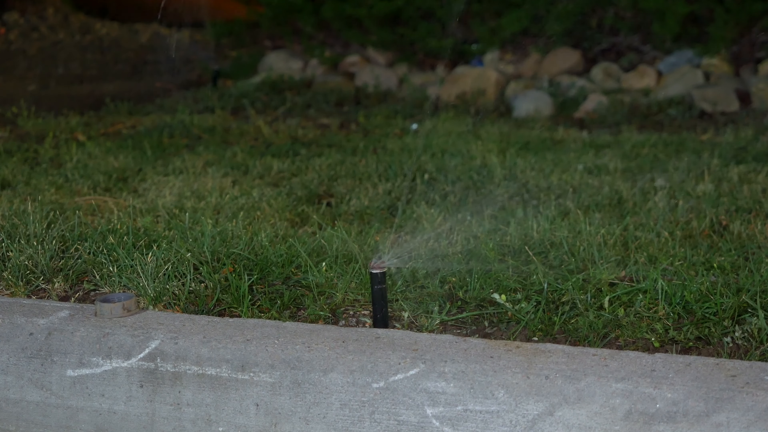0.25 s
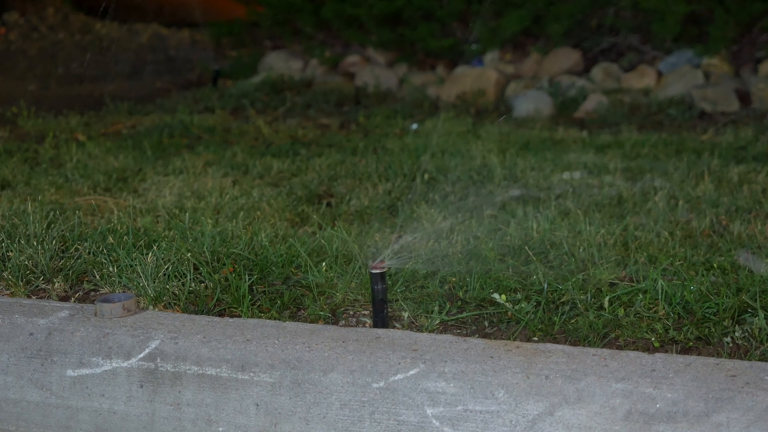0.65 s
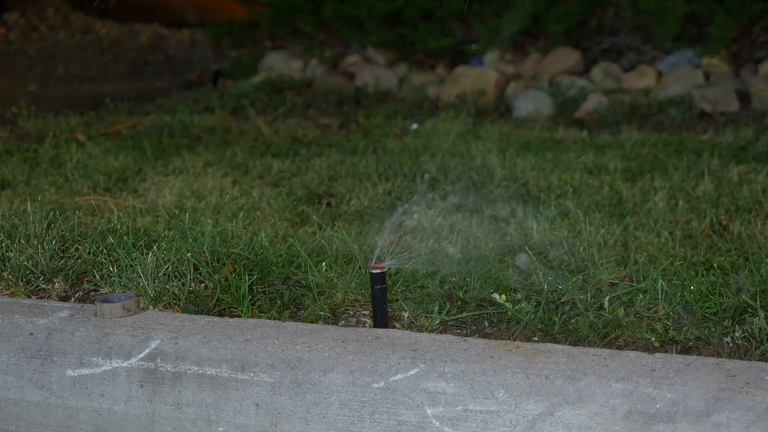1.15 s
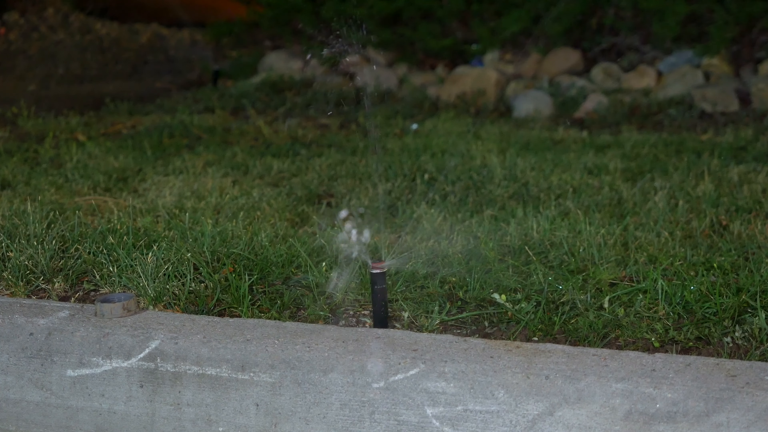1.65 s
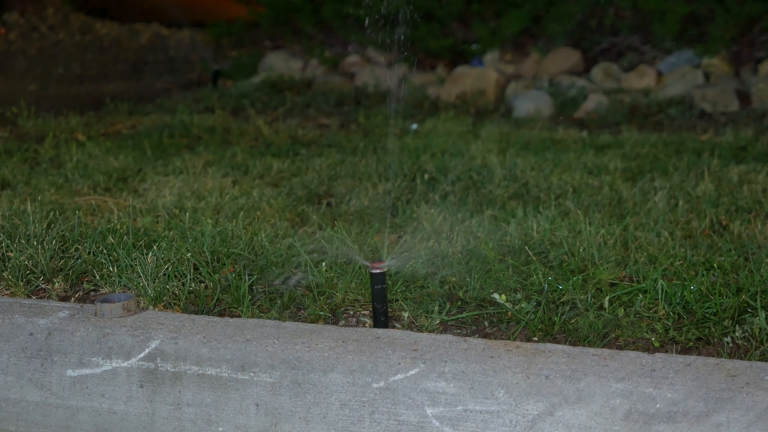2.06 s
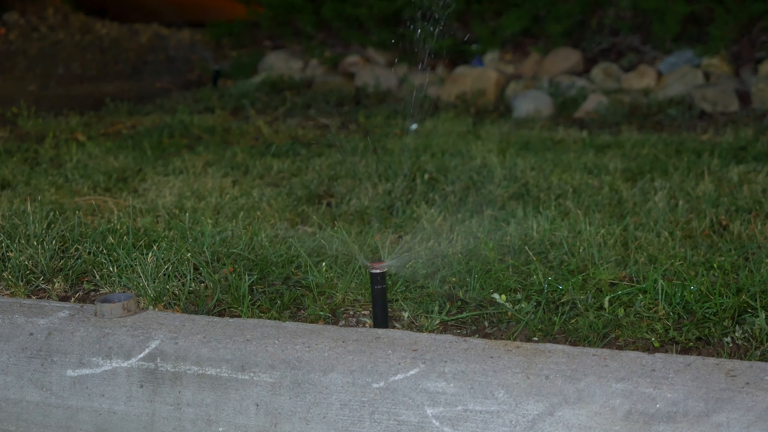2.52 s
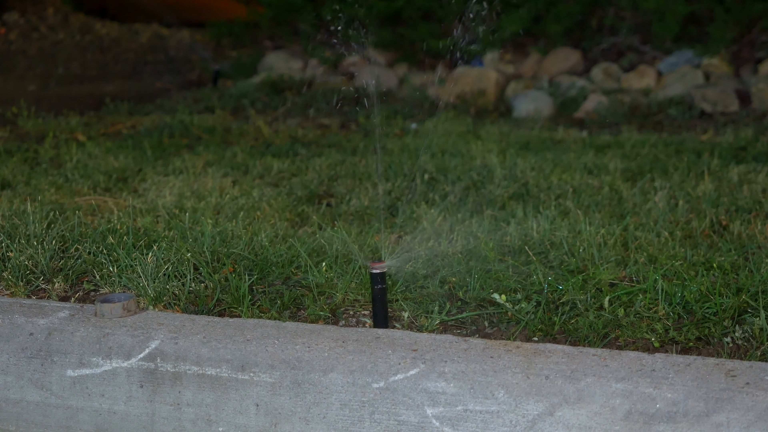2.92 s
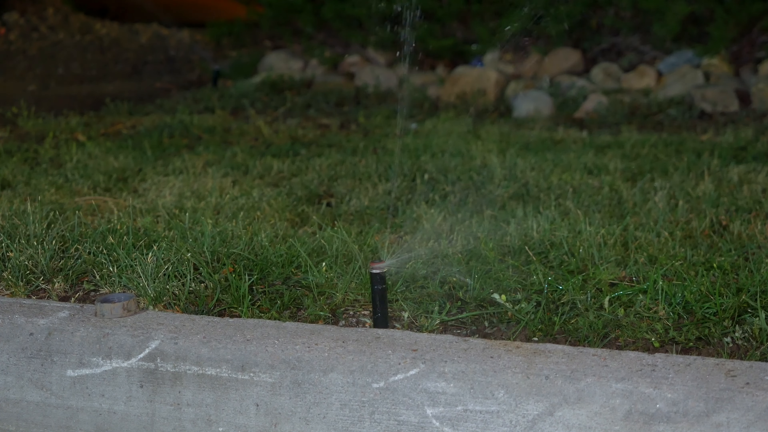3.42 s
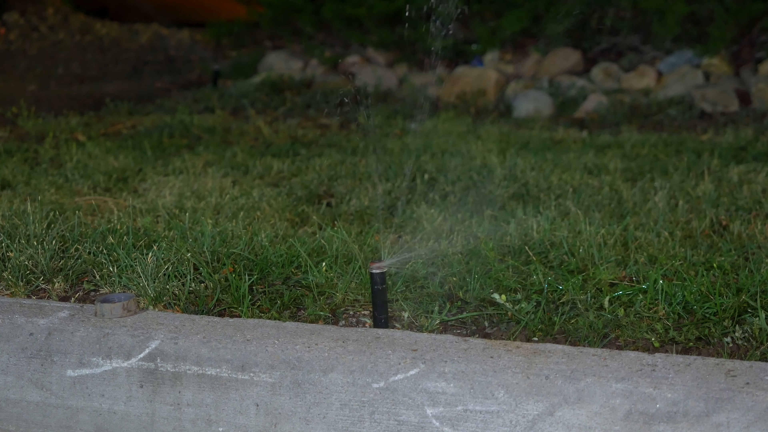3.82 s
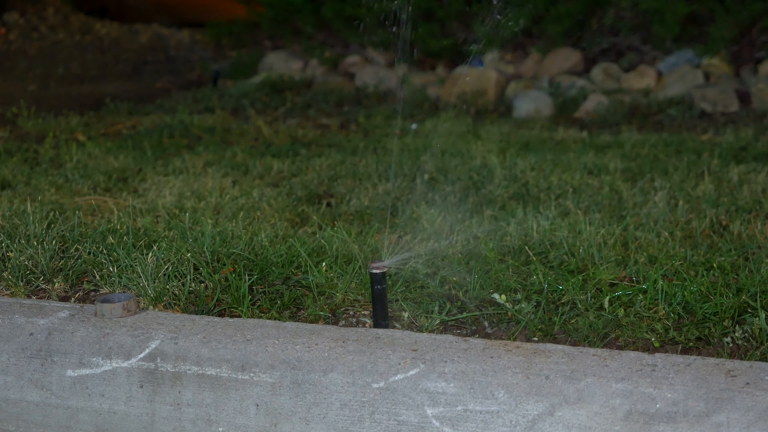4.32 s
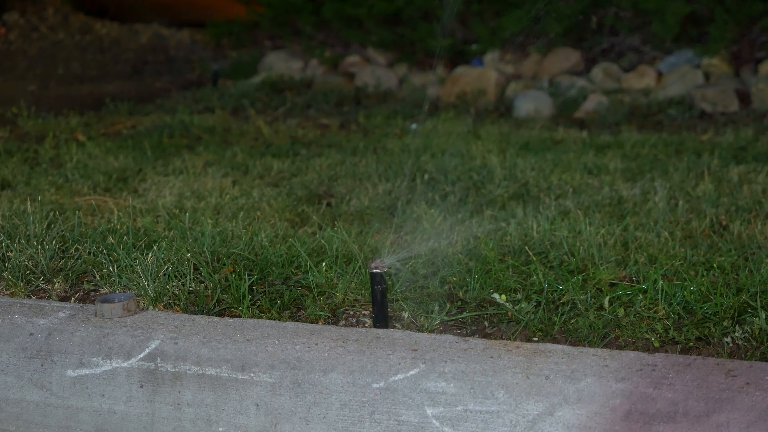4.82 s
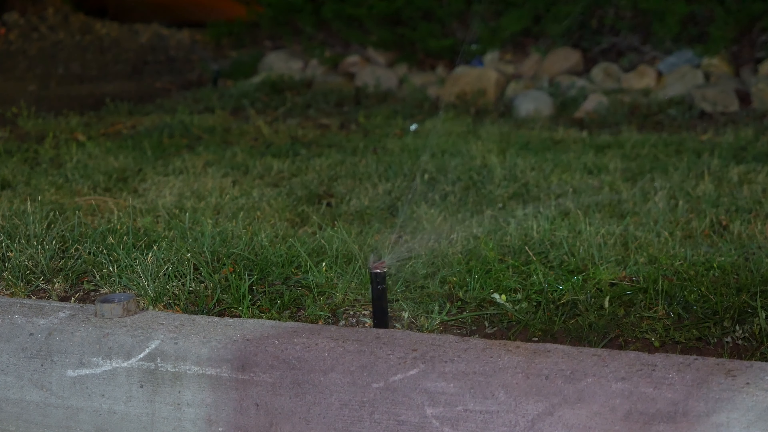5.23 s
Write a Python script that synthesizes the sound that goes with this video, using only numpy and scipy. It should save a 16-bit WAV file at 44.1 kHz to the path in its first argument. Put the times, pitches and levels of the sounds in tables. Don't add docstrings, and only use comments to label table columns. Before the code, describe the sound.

Close outdoor sound of a sprinkler nozzle spitting air and water. Bright turbulent hiss dominates, with uneven dips, a brief cutoff near one and a quarter seconds and a sharper one at two and a half. Lumpy water gurgles bubble below. After a longer stall near four and a half seconds the air blast collapses, leaving fine crisp mist, soft gurgling, a quiet fan hum and rumble.

```python
import sys
import numpy as np
from scipy import signal
from scipy.fft import rfft, irfft, next_fast_len
from scipy.io import wavfile
from scipy.ndimage import uniform_filter1d

SR = 44100
rng = np.random.default_rng(int(sys.argv[2]) if len(sys.argv) > 2 else 0)


def elevation(decibels):
    levels = np.asarray(decibels, float)
    return 10 ** (levels / 20)


def file_out(sig):
    cols = np.atleast_2d(sig).T
    lim = np.clip(cols, -1, 1)
    pcm = np.round(lim * 32767).astype(np.int16)
    wavfile.write(sys.argv[1], SR, pcm)


N = 241359

# start_s, blast_db (air pressure), churn_db (riser)
PIPE_STATE = [(0, -29, -43.5), (.9, -29, -47.5), (1.3, -28.5, -44.5), (2.0, -29, -44), (2.6, -28.5, -45.5),
              (3.2, -29, -44), (4.0, -28, -47.5), (4.28, -31.5, -46.5), (4.58, -33, -44.5),
              (4.64, -35.5, -43.5), (4.88, -43, -47.5), (5.47, -44, -44)]
# closing_s, shut_within_s, clears_s
WATER_SLUGS = [
    (1.22, .075, 1.3),
    (2.49, .03, 2.586),
    (4.28, .145, 4.577),
    (4.85, .12, 6),
]


def evened(x):
    return x / np.sqrt(np.mean(x ** 2) + 1e-20)


def read(points, hz):
    f, value = np.transpose(points)
    return np.interp(np.log(hz + 1), np.log(f + 1), value)


def column(table, t, axis):
    rows = np.asarray(table)
    return np.interp(t, rows[:, 0], rows[:, axis])


def drift(t, lo_hz, hi_hz):
    rates = np.geomspace(lo_hz, hi_hz, 30)
    cycles = rates * t[:, None] + rng.random(len(rates))
    return evened(np.sum(np.sin(2 * np.pi * cycles) / np.sqrt(rates), 1))


def spatter(per_s, spread_db, share):
    size = elevation(spread_db * np.minimum(rng.exponential(1, N), 5))
    ticks = size * (rng.random(N) < per_s / SR) * rng.choice([-1., 1.], N)
    share = np.clip(share, 0, 1)
    return np.sqrt(1 - share) * rng.standard_normal(N) + np.sqrt(share) * evened(ticks)


def shape(x, spectrum, lo_hz, hi_hz, level_db, patchy_db, size=512):
    overlap = size - size // 4
    hz, t, z = signal.stft(x, SR, nperseg=size, noverlap=overlap)
    patches = uniform_filter1d(rng.standard_normal(z.shape), 8, 0)
    patches = evened(uniform_filter1d(patches, 20, 1))
    colour = elevation(read(spectrum, hz))
    in_band = (hz > lo_hz) & (hz < hi_hz)
    colour = colour / np.sqrt(np.sum(colour[in_band] ** 2) / len(hz))
    z = z * colour[:, None] * elevation(level_db(hz[:, None], t) + patchy_db * patches)
    return signal.istft(z, SR, nperseg=size, noverlap=overlap)[1][:N]


def burps(t):
    # middle_s, half_length_s, over_churn_db
    air_pockets = [(1.077, .06, 5), (1.34, 0.074, 5), (1.633, 0.085, 4), (1.875, 0.12, 3.5),
                   (2.025, 0.017, 3), (2.332, .04, 7), (2.633, 0.045, 8.5), (2.788, 0.042, 5),
                   (3.018, 0.033, 2.5), (3.98, 0.076, 9), (4.32, 0.022, 3.5), (4.63, 0.036, 1.5)]
    return sum(db * np.exp(-((t - s) / half) ** 2) for s, half, db in air_pockets)


def shut(t):
    clear_s = .005
    closed = 0
    for s, within, clears in WATER_SLUGS:
        closed = closed + np.clip((t - s) / within, 0, 1) * np.clip((clears - t) / clear_s, 0, 1)
    return closed


def blast(t):
    # middle_s, length_s, depth_db
    spits = [(.94, 0.074, 1.5), (1.086, 0.11, 3.5), (1.209, 0.068, 4), (1.487, 0.044, 2.5), (1.62, .11, 6),
             (1.734, 0.033, 3), (1.83, 0.092, 7), (1.96, .04, 0), (2.053, 0.027, 1.5), (2.154, 0.033, 0),
             (2.283, 0.052, 2.5), (2.418, 0.043, 2), (2.481, 0.049, 16.5), (2.741, 0.048, 5),
             (2.838, 0.028, 2), (2.976, 0.029, 3), (3.093, 0.047, 1.5), (3.32, 0.036, 0.5), (3.65, .04, 1),
             (3.87, 0.067, 3.5), (3.966, 0.062, 5.5), (4.05, 0.018, 1.5)]
    shut_db, regain_db, regain_s = -38, -12, 0.02
    surge, surge_s = 0.22, 0.073
    level_db = column(PIPE_STATE, t, axis=1) + shut_db * shut(t) ** 2
    for _, _, clears in WATER_SLUGS:
        level_db = level_db + (t > clears) * regain_db * np.exp(-abs(t - clears) / regain_s)
    for s, length, depth_db in spits:
        after = np.maximum(t - s - length / 2, 0) / surge_s
        dam = np.exp(-(2 * (t - s) / length) ** 4)
        level_db = level_db - depth_db * (dam - surge * np.e * after * np.exp(-after))
    return level_db


def yard():
    # start_s, hum_db, rumble_db
    yard_levels = [(0, -50, -48.5), (.27, -42, -47.5), (.6, -56, -49), (.73, -41, -49), (1.3, -45, -46.5),
                   (1.65, -41, -44.5), (2.1, -48, -50), (2.5, -43.5, -45.5), (2.95, -41.5, -46),
                   (3.27, -51, -47), (3.52, -44, -46.5), (4.12, -54, -47.5), (4.48, -38.5, -48),
                   (4.87, -47.5, -45.5), (4.99, -38, -46.5), (5.25, -47, -43), (5.38, -40, -45.5),
                   (5.47, -57, -47)]
    # frequency_hz, density_db
    rumble_spectrum = [(25, -47), (50, -43), (70, -25), (90, -6.5), (120, -4.5), (160, -5.5), (255, -5.5),
                       (290, -16), (400, -33.5)]
    hum_hz, hum_width_hz = 120.3, 7.0
    t = np.arange(N) / SR
    turn = np.exp(2j * np.pi * hum_hz * t)
    r = np.exp(-np.pi * hum_width_hz / SR)
    noise = rng.standard_normal(N) + 1j * rng.standard_normal(N)
    wobble = signal.lfilter([1 - r], [1, -r], noise)
    hum = evened((turn * (0.72 + wobble / np.std(wobble))).real)
    hum = hum * elevation(column(yard_levels, t, axis=1) - 1.0)

    def level_db(hz, t):
        return column(yard_levels, t, axis=2) + 0.7 * burps(t) - .7 + 0 * hz
    return hum + shape(rng.standard_normal(N), rumble_spectrum, 140, 300, level_db, 1.0, size=4096)


def gurgle():
    # frequency_hz, density_db
    gurgle_spectrum = [(180, -28), (300, -1), (700, -2.5), (1100, -5.5), (1500, -10.5), (1900, -19.5),
                       (2600, -9), (4000, -21)]
    shut_churn_db = -7.5

    def level_db(hz, t):
        churn_db = column(PIPE_STATE, t, axis=2) + burps(t) + shut_churn_db * shut(t)
        return churn_db + 0.82 * drift(t, 6, 60) + 0 * hz
    return shape(spatter(2000, 1.9, 0.29), gurgle_spectrum, 320, 1400, level_db, 1.56, size=1024)


def water():
    # frequency_hz, density_db
    mist_spectrum = [(1400, -25), (2900, -14), (4300, -20), (5300, -11), (6400, -17.5), (7200, -4),
                     (8000, -2.5), (9050, -12.5), (10100, 1), (11200, -2.2), (12100, -7.5), (13200, -8.5),
                     (14100, -17), (15100, -8.5), (16000, -15)]
    # start_s, fan_db
    fan_levels = [
        (0, -46),
        (1.3, -36.5),
        (2.5, -36.5),
        (4.3, -39),
        (4.7, -34),
        (5.1, -36.5),
        (5.47, -37),
    ]

    def level_db(hz, t):
        thinning_db = 9.1 / (1 + np.exp(-(blast(t) + 35.0) / 3.1))
        steeper = np.where(hz > 12800, 2.4, 1)
        return column(fan_levels, t, axis=1) - thinning_db * steeper + .5 * drift(t, 4, 80)
    return shape(spatter(6000, 3.0, 0.33), mist_spectrum, 10020, 11700, level_db, 0.65)


def wall(x):
    # frequency_hz, echo_db
    wall_reflection = [(2000, -18), (3000, -14), (4300, -25), (5500, -17), (6500, -4), (7500, -12),
                       (8500, -34), (13000, -32), (14800, -18)]
    delay_s = .005934
    n = next_fast_len(N + SR // 10)
    hz = np.fft.rfftfreq(n, 1 / SR)
    response = elevation(read(wall_reflection, hz)) * np.exp(-2j * np.pi * hz * delay_s)
    return irfft(rfft(x, n) * response, n)[:N]


def air():
    # frequency_hz, density_db
    jet_spectrum = [(1300, -23.5), (1750, -20), (2400, -9.5), (3500, -0.6), (4400, 0.4), (5800, -6),
                    (7200, 0.5), (8700, -4), (9700, -8.5), (12300, -5.5), (13100, -8), (13800, -13.5),
                    (15000, -8.5), (16000, -20)]
    # start_s, dip_lift_db (near 5.7 kHz), notch_shift_hz (near 13.6 kHz)
    nozzle_state = [(0, 4, 120), (.9, 3, 200), (1.5, 0.5, 250), (2.2, 0.5, 30), (3.4, 1.4, -60),
                    (4.3, 1.5, -30), (5.47, -2, 26)]
    usual_db = -30
    crest_holds, top_holds = 0.43, 0.52
    crest_wet, top_wet = 0.14, 0.51

    def level_db(hz, t):
        blast_db = blast(t) + .5 * drift(t, 5, 20)
        sag_db = usual_db - blast_db
        crest_db = np.clip(crest_holds * sag_db - crest_wet * burps(t) + 0.72, -4, 6)
        crest = np.exp(-((hz - 7300) / 2200) ** 2) * crest_db
        top_db = np.clip(top_holds * sag_db - top_wet * burps(t) + 1.1, -5, 4.5)
        top = top_db / (1 + np.exp(-(hz - 9500) / 700))
        flicker = 0.65 * drift(t, 4, 30) / (1 + np.exp(-(hz - 7500) / 900))
        dip = np.exp(-((hz - 5700) / 900) ** 2) * column(nozzle_state, t, axis=1)
        notch_hz = 13600 + column(nozzle_state, t, axis=2) + 110 * drift(t, 1.3, 15)
        notch = -(13 + 3 * drift(t, 1, 10)) * np.exp(-((hz - notch_hz) / 230) ** 2)
        return blast_db + crest + top + flicker + dip + notch + .5 * drift(t, 10, 150)
    return shape(spatter(6000, 2.5, 0.4), jet_spectrum, 2500, 6850, level_db, 0.85)


def scene():
    hiss = air()
    mid = yard() + gurgle() + water() + wall(hiss) + hiss
    return np.array([mid, mid])


def thin_and_widen(mid):
    # frequency_hz, under_frame_mean_db
    weakest_line = [(700, -32), (1300, -21), (2000, -15), (3500, -11.5), (6500, -10.5), (9000, -16),
                    (12500, -15.5), (13600, -11), (14800, -15), (15700, -7)]
    # frequency_hz, side_minus_mid_db
    side_level = [(30, -44), (70, -21), (180, -18.5), (550, -17.5), (1650, -15.5), (4970, -18.4),
                  (15000, -14.5)]
    # start_s, end_s
    wide_spans = [(0, .36), (.5, .98), (1.14, 1.5), (1.88, 2.02), (2.3, 2.46), (2.78, 3.34), (3.48, 4.42),
                  (4.54, 4.86), (5.24, 5.47)]
    grid, frame = 319, 1024
    k, n = np.arange(frame), np.arange(2 * frame)
    window = np.sin(np.pi * (n + .5) / (2 * frame))
    cosines = np.cos(np.pi / frame * (n + .5 + frame / 2) * (k[:, None] + .5))
    basis = window * cosines * np.sqrt(2 / frame)
    padded = np.pad(mid, (frame - grid, 2 * frame))
    starts = np.arange(0, len(padded) - 2 * frame, frame)
    lines = padded[starts[:, None] + n] @ basis.T
    hz, t = (k + .5) * SR / 2 / frame, (starts + grid) / SR
    band = np.floor(np.where(k < 64, k / 6, 8.5 + k / 28)).astype(int)
    cells = (len(t), band.max() + 1)

    mood_db = 3.0 * uniform_filter1d(rng.standard_normal(cells), 2, 0)[:, band]
    frame_rms = np.sqrt(np.mean(lines[:, hz < 16000] ** 2, 1))[:, None]
    lines = lines * (abs(lines) > frame_rms * elevation(read(weakest_line, hz) + mood_db))

    rms = np.sqrt(abs(uniform_filter1d(lines ** 2, 8, 1)))
    busy = sum((t > a) & (t < b) for a, b in wide_spans) * (rng.random(len(t)) < .66)
    by_band = np.interp(hz, [1300, 1900, 2800, 13000, 13700, 14600], [1, .3, 1, 1, .4, 1])
    chance = np.where(busy, .75, .18)[:, None] * by_band
    chance = np.maximum(chance, np.interp(hz, [300, 900, 1500], [.85, .55, 0]))
    kept = rng.random(cells)[:, band] < chance
    side = kept * rms * elevation(read(side_level, hz) + 1.5) * rng.standard_normal(rms.shape)

    out = np.zeros((2, len(padded)))
    for channel, part in zip(out, (lines + side, lines - side)):
        np.add.at(channel, starts[:, None] + n, part @ basis)
    return out[:, frame - grid:][:, :N]


def roll_off(x):
    return signal.sosfilt(signal.butter(12, 15850, fs=SR, output="sos"), x)


def record(dry):
    edge = signal.firwin(601, 15760, window=("kaiser", 9), fs=SR)
    mid = signal.oaconvolve(dry.mean(0), edge, "same")
    mid = signal.sosfilt(signal.butter(2, 55, "high", fs=SR, output="sos"), mid)
    mix = thin_and_widen(mid) * elevation([[-.06], [.06]])
    return roll_off(mix)


dry = scene()
out = record(dry)
file_out(out)
```